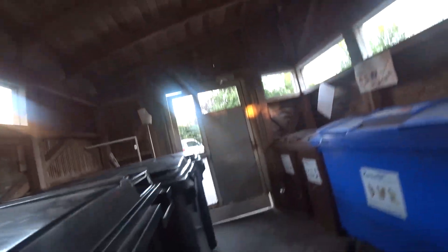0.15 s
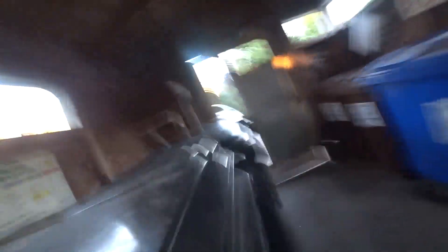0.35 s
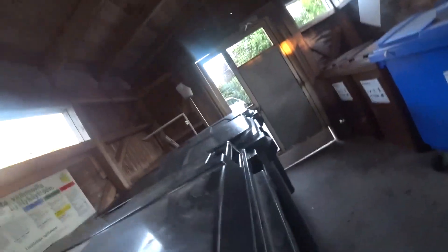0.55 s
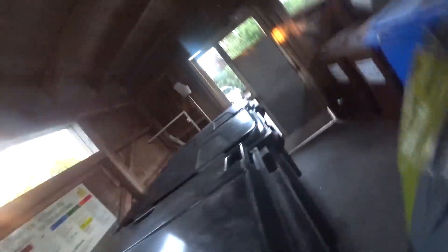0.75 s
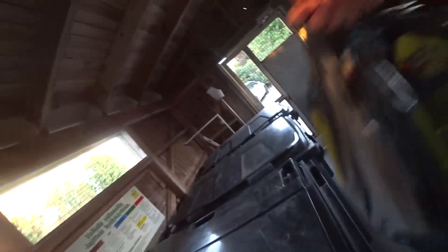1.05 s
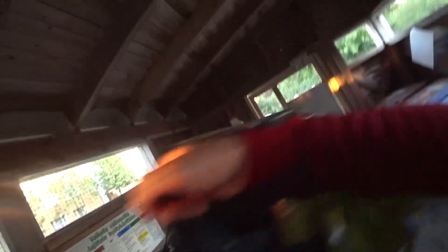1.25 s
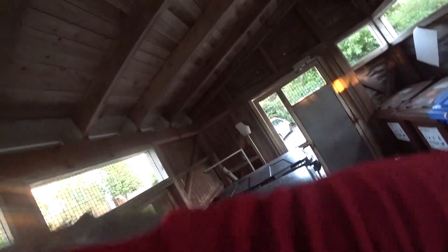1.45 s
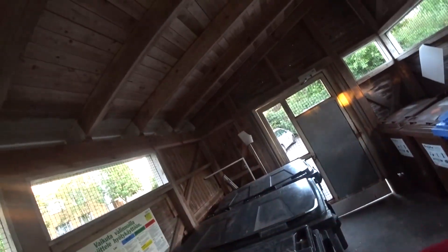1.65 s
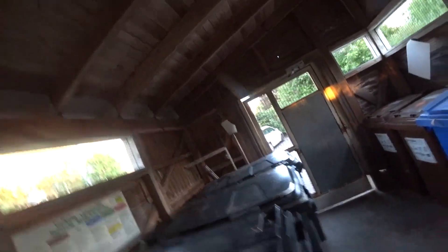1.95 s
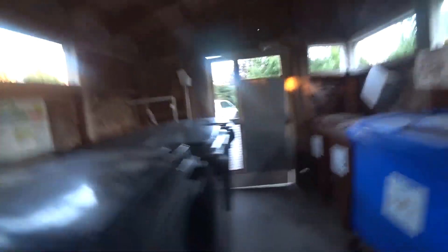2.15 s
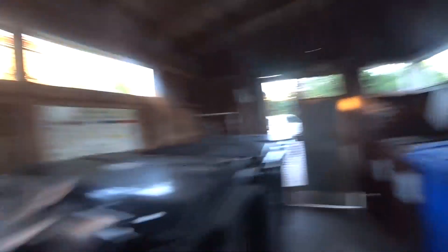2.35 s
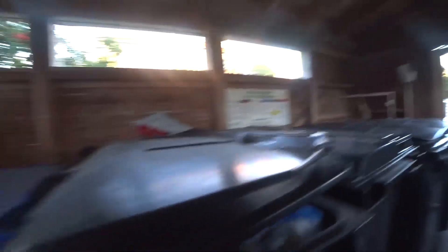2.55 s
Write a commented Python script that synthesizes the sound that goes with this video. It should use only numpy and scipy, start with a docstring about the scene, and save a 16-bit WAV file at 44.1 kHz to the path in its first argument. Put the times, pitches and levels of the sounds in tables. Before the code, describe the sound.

Inside a small wooden shed, a bag is swung up with soft crackles and camera bumps, then lands in a plastic bin in a loud burst of thumps, snaps and rattles that quickly dies away.

```python
"""Rubbish bag into a wheelie bin

In a wooden bin shed a plastic bag is lifted and swung close to the camera, then stuffed into a wheelie bin.
Its film crackles and snaps (random contacts, grains and short modes); its contents tumble, knock and crash
(hails of bumps through resonances, damped modes). Birds chirp faintly outside (gliding tones) over outdoor
air (shaped noise), and the moving camera rumbles and thuds (low noise and modes). The shed reverberates."""
import sys
import numpy as np
from scipy import signal
from scipy.fft import rfft, irfft, next_fast_len
from scipy.io import wavfile
from scipy.ndimage import uniform_filter1d, map_coordinates

SR = 44100
rng = np.random.default_rng(int(sys.argv[2]) if len(sys.argv) > 2 else 0)


def to_linear_factor(level_db):
    """Convert decibel levels (scalar or array-like) to linear amplitude factors."""
    exponent = np.asarray(level_db, float) / 20
    return 10 ** exponent


def pcm_store(signal):
    """Save signal as 16-bit PCM."""
    levels = np.round(np.clip(np.atleast_2d(signal), -1, 1) * 32767)
    wavfile.write(sys.argv[1], SR, levels.astype(np.int16).T)


N = 119070
TIME = np.arange(N) / SR
HALVES = [0.5, -0.5]  # shares a left-right difference between the two channels


def unit(x):
    """Normalisation: scales a signal to rms 1."""
    return x / np.sqrt(np.mean(x ** 2) + 1e-20)


def along(points, hz):
    """Spectral envelope: (Hz, value) points joined on a logarithmic frequency axis."""
    f, v = np.transpose(points)
    return np.interp(np.log(hz + 1), np.log(f + 1), v)


def curves(stretches):
    """Temporal envelope: one value per sample for each column after the time, stretch after stretch."""
    s, *columns = np.transpose(np.concatenate(stretches))
    return [np.interp(TIME, s, column) for column in columns]


def wobble(rate):
    """Random modulation: a smooth curve through random knots, rate knots a second."""
    return map_coordinates(rng.standard_normal(int(N * rate / SR) + 4), [TIME * rate])


def filtered(x, response):
    """Linear filtering: the spectrum times a complex response of frequency."""
    m = next_fast_len(N + SR // 2)
    return irfft(rfft(x, m) * response(np.fft.rfftfreq(m, 1 / SR)), m)[..., :N]


def highpass(hz, corner_hz, order):
    """High-pass weighting: magnitude rising with the given power of frequency below the corner."""
    return hz ** order / (hz ** order + corner_hz ** order)


def resonances(peaks):
    """Modal summation: causal response of a row of resonances with alternating sign."""
    def response(f):
        total = 0
        for k, (centre, width, db) in enumerate(peaks):
            band = 1j * f * width
            total = total + (-1) ** k * to_linear_factor(db) * band / (centre ** 2 - f ** 2 + band + 1e-9)
        return total
    return response


def spikes(per_s, spread_db, hiss_db):
    """Shot noise: two unrelated rows of random contacts of uneven size, over a hiss."""
    sign = np.sign(rng.standard_normal((2, N)))
    size = to_linear_factor(spread_db * rng.standard_normal((2, N))) * sign
    contacts = unit(size * (rng.random((2, N)) < per_s / SR))
    return contacts + to_linear_factor(hiss_db) * rng.standard_normal((2, N))


def grains(centre_hz, octaves, cycles, spread_db, count):
    """Granular excitation: scattered damped tones of random pitch and size, rms 1."""
    when = rng.random(count)
    size = to_linear_factor(spread_db * rng.standard_normal((count, 1)))
    hz = centre_hz * 2 ** (octaves * rng.standard_normal((count, 1)))
    hz = np.clip(hz, centre_hz / 3, 10500)
    k = np.arange(round(6 * cycles * SR / centre_hz))
    wave = size * np.sin(2 * np.pi * hz * k / SR) * np.exp(-k * hz / SR / cycles)
    place = (when * N).astype(int)[:, None] + k
    heap = np.bincount(place.ravel(), wave.ravel(), N)[:N]
    return unit(filtered(heap, lambda f: highpass(f, centre_hz / 3, 4)))


def patchy(pair, depth_db):
    """Time-frequency modulation: random patches of gain over time and frequency."""
    z = signal.stft(pair, nperseg=256)[2]
    field = uniform_filter1d(rng.standard_normal(z.shape[1:]), size=10, axis=0)
    field = uniform_filter1d(field, size=7, axis=1)
    return signal.istft(z * to_linear_factor(depth_db * unit(field)), nperseg=256)[1][:, :N]


def add(track, s, sound):
    """Superposition: lays a sound on the track at time s."""
    part = track[..., round(max(s, 0) * SR):][..., :sound.shape[-1]]
    part += sound[..., :part.shape[-1]]


def ring(hz, t60, attack=0.0002):
    """Damped oscillation: one mode with exponential decay and onset, times in seconds."""
    t = TIME[:SR // 4]
    return np.sin(2 * np.pi * hz * t) * to_linear_factor(-60 * t / t60) * (1 - np.exp(-t / attack))


def tones(rows, rough, blur):
    """Frequency modulation: short gliding tones, fluttering in level (rough) and pitch (blur)."""
    out = np.zeros(N)
    waver = 1 + blur * wobble(301.4)
    for s, length, start_hz, end_hz, db in rows:
        u = np.linspace(0, 1, round(length * SR))
        hz = (start_hz + (end_hz - start_hz) * u) * waver[round(s * SR):][:len(u)]
        swell = np.sin(np.pi * u) ** 0.5
        add(out, s, to_linear_factor(db) * swell * np.sin(2 * np.pi * np.cumsum(hz) / SR))
    return out * to_linear_factor(rough * wobble(156))


# Likeness of left and right. Each row: frequency in Hz, correlation.
LIKENESS = [(60, 1), (300, 0.92), (1000, 0.72), (4000, 0.89), (10000, 0.91)]


def spread(pair):
    """Partial coherence: two unrelated signals, as mid and side, become left and right."""
    def mid_side_gains(hz):
        turn = np.arccos(np.clip(along(LIKENESS, hz), -1, 1)) / 2
        return np.array([np.cos(turn), np.sin(turn)])
    mid, side = filtered(pair, mid_side_gains)
    return np.array([mid + side, mid - side])


# Spectrum of the outdoor air. Each row: frequency in Hz, relative density in dB.
AIR_COLOUR = [(15, -40), (25, 8), (394, -9.5), (1120, -11.5), (1310, -14), (2360, -17), (10100, -31),
              (11200, -59), (14600, -67), (22000, -120)]


def outdoor_air():
    """Stationary noise: broadband air sound, strongest in the bass, at a steady level."""
    noise = filtered(rng.standard_normal((2, N)), lambda hz: to_linear_factor(along(AIR_COLOUR, hz)))
    return to_linear_factor(-47.5) * unit(spread(noise))


# Bird chirps. Each row: start in seconds, length in seconds, start pitch in Hz, end pitch in Hz,
# level in dB before flutter.
CHIRPS = [(0.004, 0.04, 2330, 2330, -54.5), (.054, 0.06, 3650, 3550, -52), (.125, 0.022, 6540, 6450, -53),
          (.155, 0.031, 3200, 3210, -51.5), (.215, 0.049, 2400, 2500, -51), (.265, 0.062, 2500, 2600, -54),
          (.535, 0.017, 3020, 2800, -39)]


def birds():
    """Tonal radiation: faint whistled glides, fluttering in level and pitch."""
    return tones(CHIRPS, rough=5, blur=0.028)


# Decay of the shed. Each row: frequency in Hz, t60 in seconds.
SHED_DECAY = [(150, 0.12), (1500, 0.18), (10000, 0.36)]


def shed(x):
    """Reverberation: each frequency of the walls' answer dies at its own speed."""
    hz, t, z = signal.stft(rng.standard_normal((2, SR // 2)), SR, nperseg=256)
    decay = to_linear_factor(-60 * t / along(SHED_DECAY, hz)[:, None])
    tail = signal.istft(z * decay, SR, nperseg=256)[1]
    delayed = np.pad(x, (200, 0))[None]  # first answer 4.5 ms late
    return signal.fftconvolve(delayed, tail / np.linalg.norm(tail[0]), axes=1)[:, :N]


# Rumble of the handled camera. Each row: time in seconds, level in dB.
HANDLING = [
    [(0.0, -64), (0.016, -50), (0.052, -64), (0.098, -48), (0.146, -62), (0.266, -52), (0.294, -70),
     (0.372, -65), (0.395, -51)],
    [(0.41, -37), (0.436, -31), (0.6, -53.5), (0.744, -37), (0.98, -32.5), (1.184, -48.5), (1.228, -37),
     (1.26, -53), (1.3, -36)],
    [(1.3, -46), (1.338, -60), (1.358, -48.5), (1.884, -39.5), (2.122, -41), (2.18, -24.5), (2.324, -43),
     (2.484, -32), (2.7, -42)],
]
# Spectrum of that rumble. Each row: frequency in Hz, relative density in dB.
BODY_COLOUR = [(12, -37), (20, 4), (38, -3.5), (91, -5), (178, -10), (221, -21), (300, -36), (390, -120)]
# Soft thuds on the camera body. Each row: start in seconds, level in dB, pitch in Hz, t60 in seconds.
THUDS = [(0.404, -20, 142, 0.12), (0.764, -21.5, 60.5, 0.13), (0.912, -14, 95, 0.035),
         (0.938, -15.5, 62, 0.072), (0.968, -14, 119, 0.032), (0.994, -17.5, 104, 0.077),
         (1.205, -25.5, 100, 0.089), (2.16, -14, 72.6, 0.095), (2.218, -13, 176, 0.11)]


def camera():
    """Structure-borne sound: low lumpy rumble and damped thuds through the camera body."""
    [level_db] = curves(HANDLING)
    common, own = unit(filtered(rng.standard_normal((2, N)), lambda hz: to_linear_factor(along(BODY_COLOUR, hz))))
    rumble = common + to_linear_factor(-11) * own * [[1], [-1]]  # a weaker part opposite in the two ports
    out = unit(rumble * to_linear_factor(1.2 * wobble(25.1))) * to_linear_factor(level_db)
    for s, db, hz, t60 in THUDS:
        add(out, s, to_linear_factor(db) * ring(hz, t60, 0.0011)[None])
    return out


# Humming of a hollow thing. Each row: start in seconds, length in seconds, start pitch in Hz,
# end pitch in Hz, level in dB before flutter.
HUMS = [(.182, 0.04, 454, 460, -38)]


def hollow_hum():
    """Cavity resonance: a hollow thing hums briefly, fluttering a little."""
    return tones(HUMS, rough=2, blur=0.01)


# A hard plastic click. Each row: start in seconds, relative level in dB.
CLICK = [(0.5674, -9)]
# Its modes. Each row: frequency in Hz, relative level in dB, t60 in seconds.
CLICK_MODES = [(1380, 3, 0.013), (1940, 6, 0.017), (2500, 15.5, 0.0063), (3510, 10.5, 0.012),
               (5600, -7, .01)]


def click():
    """Modal impact response: hard plastic sounds several fast-dying modes at once."""
    out = np.zeros(N)
    for s, db in CLICK:
        modes = sum(to_linear_factor(level) * ring(hz, t60, 0.0013) for hz, level, t60 in CLICK_MODES)
        add(out, s, to_linear_factor(db - 7) * modes)
    return out


# Knocks of hard things on the bin. Each row: start in seconds, level of the main mode in dB,
# its pitch in Hz, its t60 in seconds.
KNOCKS = [(0.152, -36, 420, 0.066), (0.174, -25.5, 507, 0.029), (0.403, -35, 147, 0.23),
          (0.609, -32, 181, 0.098), (0.771, -28.5, 1060, 0.03), (1.508, -19.5, 764, 0.018),
          (1.801, -15.5, 783, 0.097), (1.824, -13.5, 411, 0.063), (1.848, -7.5, 960, 0.012),
          (1.883, -12, 285, 0.038), (2.0472, -13, 710, 0.052), (2.084, -14, 770, 0.062),
          (2.1055, -13, 904, 0.18), (2.148, -8, 282, 0.021), (2.221, -30, 168, 0.048),
          (2.3936, -16, 906, 0.21), (2.506, -14, 851, 0.064)]


def knocks():
    """Inharmonic impact: a main mode with a longer and a much shorter partial above it."""
    out = np.zeros(N)
    for s, db, hz, t60 in KNOCKS:
        partials = ring(1.54 * hz, 1.9 * t60) + ring(1.5 * hz, 0.15 * t60)
        add(out, s, to_linear_factor(db) * (ring(hz, t60) + 0.31 * partials))
    return out


# Contents tumbling on the bin walls. Each row: time in seconds, relative level of the boom in dB,
# relative level of the clatter in dB.
TUMBLE = [
    [(0.0, -69, -58), (0.138, -72, -65), (0.152, -50, -45), (0.186, -38, -42.5), (0.29, -86, -55.5),
     (0.378, -61, -70), (0.397, -68, -70)],
    [(0.406, -33.5, -30), (0.422, -32.5, -36), (0.492, -44, -46), (0.508, -49, -44), (0.522, -40, -62),
     (0.532, -41, -44), (0.56, -50, -66)],
    [(0.575, -64, -50), (0.599, -38, -41), (0.75, -47, -47.5), (0.78, -36.5, -41), (0.931, -41, -47),
     (0.973, -40, -36.5), (1.025, -43.5, -44.5), (1.395, -48, -46), (1.6, -47, -37.5)],
    [(1.6, -39, -32.5), (1.645, -39.5, -39.5), (1.688, -29.5, -30.5), (1.764, -30, -21.5), (1.79, -33, -21),
     (1.828, -19, -21), (1.852, -21, -13.5), (1.88, -19.5, -36), (1.905, -22.5, -20.5), (1.94, -26, -26.5),
     (2.012, -24.5, -30.5), (2.04, -34, -48)],
    [(2.05, -20.5, -16.5), (2.1, -20.5, -26), (2.108, -15.5, -16.5), (2.145, -19, -15.5), (2.178, -19, -16),
     (2.226, -20.5, -15.5), (2.238, -18.5, -18.5), (2.375, -39, -47.5)],
]
# Resonances of the bin walls. Each row: frequency in Hz, width in Hz, relative level in dB.
BIN_WALLS = [(140, 72, -25), (234, 300, 22), (414, 1100, -11)]
# Resonances of the packaging. Each row: frequency in Hz, width in Hz, relative level in dB.
PACKAGING = [(747, 415, -2.5), (1453, 122, -3), (1763, 124, -1.5), (3200, 1270, -12)]


def contents():
    """Excited resonance: a hail of bumps rings bin walls and packaging; loose things rap."""
    out = 0
    for level_db, peaks, rap_hz in zip(curves(TUMBLE), (BIN_WALLS, PACKAGING), (310, 1000)):
        bumps = spikes(per_s=900, spread_db=0.5, hiss_db=3.5)  # the hiss is scraping
        rung = unit(filtered(bumps, lambda hz: resonances(peaks)(hz) * highpass(hz, 110, 2)))
        raps = to_linear_factor(-3) * grains(rap_hz, octaves=0.4444, cycles=5, spread_db=1.5, count=400)
        out = out + (spread(rung) + raps) * to_linear_factor(level_db - 4 + 1.65 * wobble(70))
    return out


# Loads crashing down. Each row: start in seconds, relative level in dB, rise in seconds, hold in seconds,
# t60 of the bass in seconds, t60 of the treble in seconds.
CRASHES = [(2.39, -19.5, 0.0049, 0.019, 0.66, 0.2), (2.506, -20, 0.0038, 0.017, 0.51, 0.22)]
# Resonances, one list per load. Each row: frequency in Hz, width in Hz, relative level in dB.
LOAD_PEAKS = [
    [(870, 160, 3), (2400, 290, -9.5), (3210, 250, 5), (4400, 120, 6.5), (5930, 330, 0.5)],
    [(302, 68, -9), (837, 69, 4), (1220, 130, -1), (1690, 36, 1.5), (2240, 48, 3), (3060, 32, 7.5),
     (4110, 59, 0.5), (5620, 93, -4), (7040, 820, -5)],
]
# Broad colour, one list per load. Each row: frequency in Hz, relative density in dB.
LOAD_COLOURS = [
    [(88, -42), (150, -18), (427, -10), (560, -16), (695, -1.5), (912, -15.5), (1070, -16), (5850, -19),
     (11200, -34), (14600, -66), (22000, -120)],
    [(88, -38), (150, -21), (332, 0), (591, -10), (789, -2.5), (1880, -19.5), (2250, -9), (6760, -20),
     (11200, -41), (14600, -65), (22000, -120)],
]


def crashes():
    """Frequency-dependent damping: each load rattles briefly, bass dying slower than treble."""
    out = np.zeros((2, N))
    for (s, db, rise, hold, bass, treble), peaks, colour in zip(CRASHES, LOAD_PEAKS, LOAD_COLOURS):
        t = np.maximum(TIME - s, 0)

        def fall(t60):
            return np.clip(t / rise, 0, 1) * to_linear_factor(db - 60 * np.maximum(t - rise - hold, 0) / t60)

        hail = spikes(per_s=2500, spread_db=3, hiss_db=0)
        debris = unit(filtered(hail, lambda hz: to_linear_factor(along(colour, hz))))
        ringing = unit(filtered(hail[::-1], resonances(peaks)))
        load = debris + to_linear_factor(-2.5) * ringing
        low = filtered(load, lambda hz: 1 / (1 + (hz / 1500) ** 2))
        out += low * fall(bass) + (load - low) * fall(treble)
    return spread(out)


# Snaps of the film. Each row: start in seconds, level of the main mode in dB, its pitch in Hz.
SNAPS = [(0.1196, -34, 6400), (0.4026, -22, 5350), (0.9748, -14.5, 3600), (1.1124, -25.5, 3880),
         (1.181, -18.5, 7560), (1.2252, -21, 3200), (1.2764, -23, 2730), (1.339, -21, 3130),
         (1.363, -20.5, 3120), (1.394, -25, 2500), (1.436, -18.5, 3120), (1.454, -30, 2000),
         (1.4735, -18, 3780), (1.486, -23, 2400), (1.492, -17, 6000), (1.5216, -14, 5960),
         (1.5456, -17, 5000), (1.746, -13, 3400), (1.949, -10, 2730), (1.978, -9, 3020),
         (2.0479, -1.5, 2870), (2.105, -12, 3000), (2.209, -8.5, 3200), (2.6696, -23.5, 2520)]


def snaps():
    """Impulsive buckling: a snap of film is a few cycles of one mode, a sharp crack and a noise tail."""
    out, t = np.zeros(N), TIME[:SR // 4]
    crack = 0.85 * ring(7160, 0.0017, 0.00002) - 0.5 * ring(4200, 0.001, 0.00005)
    for s, db, hz in SNAPS:
        bright_noise = np.diff(rng.standard_normal(len(t) + 1))
        tail = bright_noise * to_linear_factor(-19.5 - 60 * t / 0.12)  # t60 of 0.12 s
        mode = ring(hz, 7.9 / hz, 0.00005)  # falls 60 dB in 7.9 cycles
        add(out, s, to_linear_factor(db) * (mode + crack + tail))
    return out


# Crackle of the bag's film. Each row: time in seconds, relative level in dB, left minus right in dB.
RUSTLE = [
    [(0.0, -65, -12), (0.062, -65, -2), (0.16, -47, -2), (0.21, -52.5, 2.0), (0.244, -46, 1.5),
     (0.3, -56, -4), (0.397, -63, 0.5)],
    [(0.406, -35, 5), (0.43, -37, 3), (0.488, -48, 2.0), (0.56, -48, 3)],
    [(0.575, -31.5, 3), (0.599, -38.5, 2.0), (0.757, -43.5, 3), (0.791, -36.5, 2), (0.915, -43, 1),
     (0.968, -38, 1), (0.976, -35.5, 3), (1.004, -38, 2.5)],
    [(1.12, -39, 1.5), (1.218, -39.5, -4), (1.43, -45, -2), (1.47, -37.5, 0), (1.52, -34.5, 1),
     (1.536, -44.5, 5), (1.6, -32.5, 1.0)],
    [(1.6, -33, 3), (1.614, -28, 0), (1.648, -35.5, 3), (1.678, -25, -0.5), (1.794, -22, 2),
     (1.864, -25.5, 4), (1.884, -25, 2), (1.905, -27, 4), (2.01, -27, 2.5), (2.04, -26, 6)],
    [(2.05, -26, 7), (2.09, -18.5, 1), (2.108, -30, 3), (2.165, -26.5, 4), (2.214, -25, 3), (2.32, -41, 2),
     (2.375, -40.5, 4)],
    [(2.66, -54, -7), (2.672, -48, -3), (2.686, -46.5, -1), (2.7, -45, 4.5)],
]
# Spectrum of the film. Each row: frequency in Hz, relative density in dB.
FILM_COLOUR = [(410, 3), (700, -10), (795, -12), (1280, -6.5), (2310, -8), (3200, -9.5), (7640, -10),
               (10600, -15.5), (11200, -29), (14600, -56), (22000, -120)]


def bag():
    """Crackling noise: random contacts in the film, in clumps that follow the handling of the bag."""
    level_db, pan_db = curves(RUSTLE)
    crinkles = spikes(per_s=3000, spread_db=5, hiss_db=0)
    film = unit(filtered(crinkles, lambda hz: to_linear_factor(along(FILM_COLOUR, hz)) * highpass(hz, 450, 4)))
    crackle = spread(unit(patchy(film, depth_db=1.8)))
    folds = to_linear_factor(-8) * grains(5280, octaves=0.8, cycles=1.3, spread_db=3, count=1100)
    return (crackle + folds) * to_linear_factor(level_db + 0.9 * wobble(90) + np.outer(HALVES, pan_db))


# Lean of the bin sounds. Each row: frequency in Hz, left minus right in dB.
LEAN = [(60, 3), (220, 0), (840, 1.5), (3140, 4), (11700, -2)]


def lean(x):
    """Interaural level difference: each frequency is weighted towards one side."""
    return filtered(x, lambda hz: to_linear_factor(np.outer(HALVES, along(LEAN, hz))))


def scene():
    """Superposition: bag and bin with their reverberation, over birds, outdoor air and camera."""
    hard = knocks() + snaps() + click() + hollow_hum()
    near = lean(contents() + crashes() + hard) + bag()
    chirping = birds()
    indoors = near + to_linear_factor(-8.5) * shed(near.mean(0))
    outdoors = chirping + to_linear_factor(3) * shed(chirping) + outdoor_air()
    return indoors + outdoors + camera()


# Phase between the microphone ports. Each row: frequency in Hz, lead of the left in radians.
LEAD = [(0, 0), (860, 0.69), (2330, 0.79), (5770, 0.46), (8960, 0.94), (10900, 0.99), (11900, 1)]


def two_ports(x):
    """Phase difference: two microphone ports a little apart take each frequency at different phases."""
    return filtered(x, lambda hz: np.exp(np.outer([0.5j, -0.5j], along(LEAD, hz))))


def band_limit(x):
    """A steep low-pass at the top of the band."""
    return signal.sosfilt(signal.butter(12, 12340, fs=SR, output="sos"), x)


def record(dry):
    """Saturation and band limiting: peaks round off softly, treble falls from 11.1 kHz to a faint skirt."""
    ceiling, knee, top_hz = 0.85, 3, 11250
    ports = two_ports(dry)
    soft = ports / (1 + np.abs(ports / ceiling) ** knee) ** (1 / knee)
    # the skirt of gain 0.008 ends at 12340 Hz
    mix = filtered(soft, lambda hz: np.clip((top_hz - hz) / 150, 0.008 * (hz < 12340), 1))
    return band_limit(mix)


dry = scene()
out = record(dry)
pcm_store(out)
```